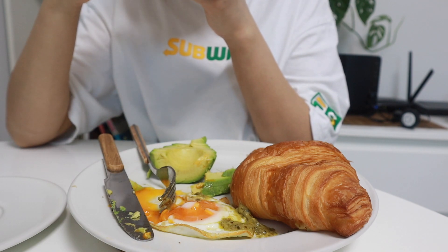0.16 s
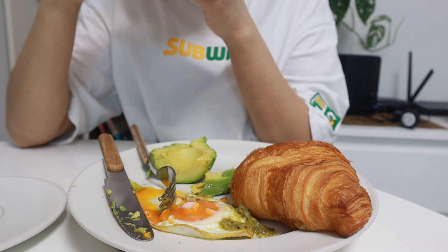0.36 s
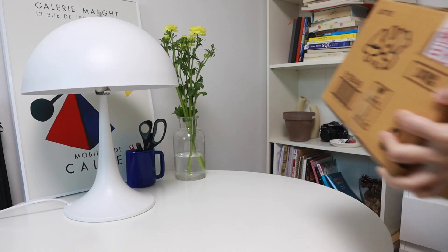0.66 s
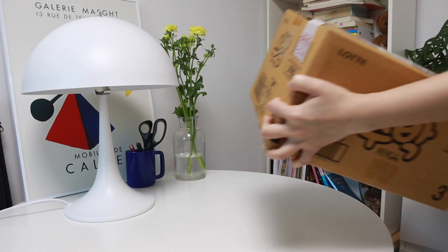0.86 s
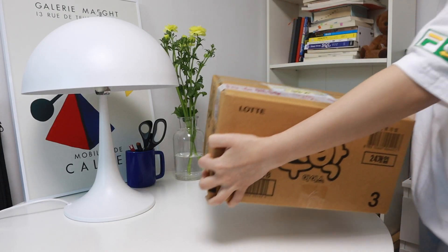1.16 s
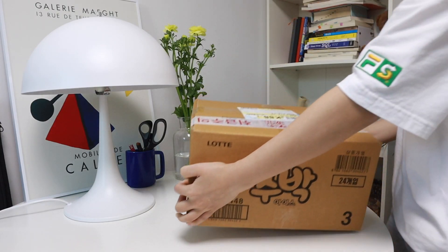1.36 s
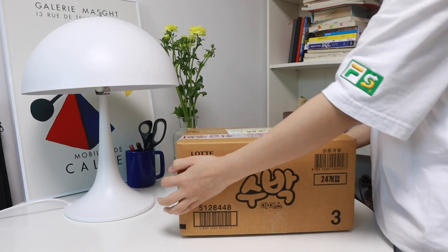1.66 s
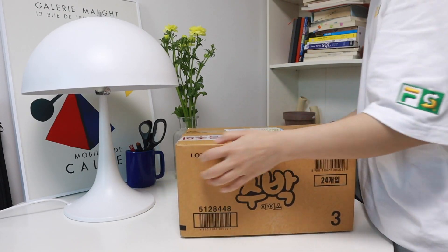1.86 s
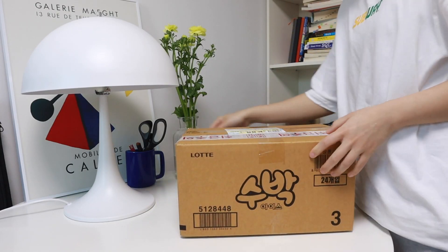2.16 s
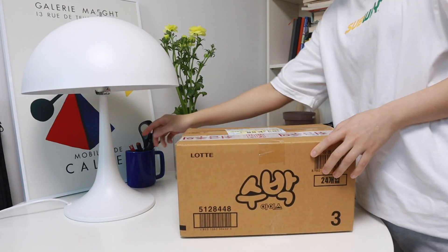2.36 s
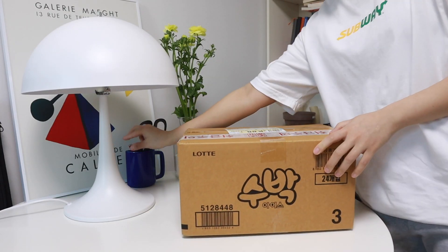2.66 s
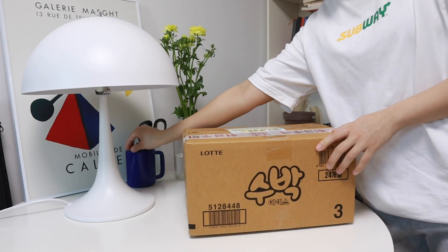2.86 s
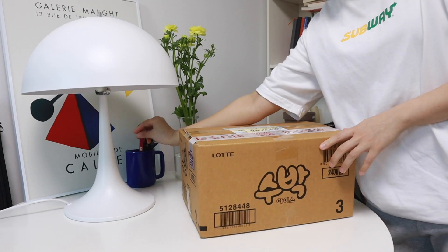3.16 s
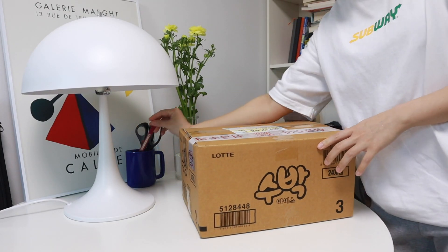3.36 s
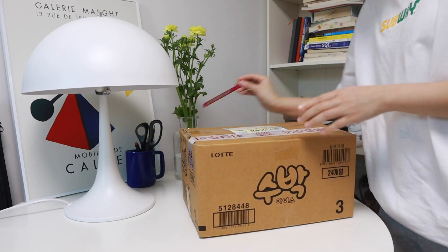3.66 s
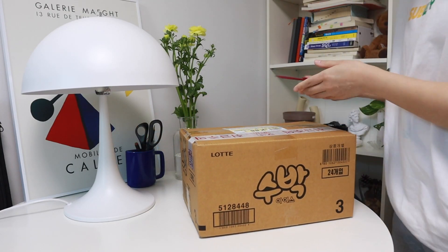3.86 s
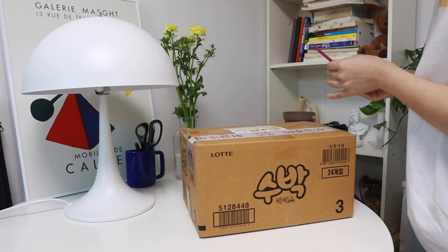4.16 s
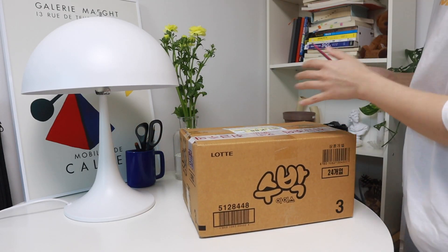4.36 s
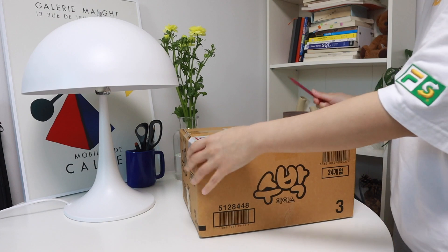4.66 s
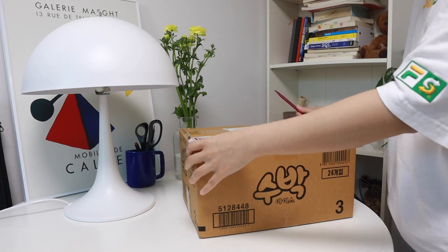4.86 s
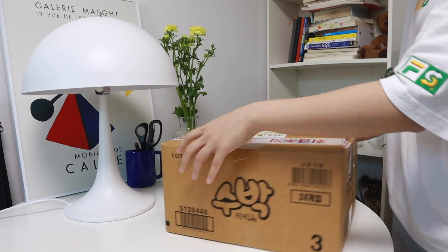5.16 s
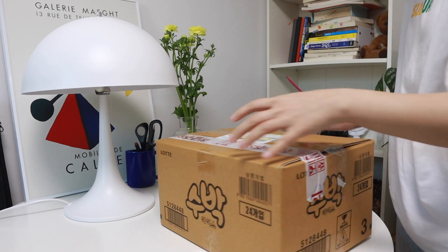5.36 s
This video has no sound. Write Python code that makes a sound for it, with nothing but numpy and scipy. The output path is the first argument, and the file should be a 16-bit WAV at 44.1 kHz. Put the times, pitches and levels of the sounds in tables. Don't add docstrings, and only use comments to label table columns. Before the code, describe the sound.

A quiet small room with low hum and soft air, heard close in stereo. After faint ticks, a switch snaps crisply at about 0.74 s and releases, slightly lower, at 0.83 s. Light rubbing leads to a cardboard box landing at 1.5 s: a quick cluster of dull, low thuds with a table boom and a grainy scuff, settling by 1.7 s. Hands brush the carton around 2.1 s; a dry tick comes at 2.67 s. Soft hollow knocks at 3.0 and 3.1 s precede ceramic clinks from a mug at 3.2 s and a brighter rim hit at 3.42 s, with fading taps until 3.6 s. Sparse handling ticks follow, sharper near 4.0 s. At 4.6 s a cutter blade slides out in a rapid ratcheting hiss of a tenth of a second. The box bumps softly at 4.7 and 4.93 s, then rubs and drags, with a high chirp at 5.08 s and short lower squeaks until 5.45 s, leaning right.

```python
import sys
import numpy as np
from scipy import signal
from scipy.fft import rfft, irfft, next_fast_len
from scipy.io import wavfile
from scipy.ndimage import uniform_filter1d

SR = 44100
rng = np.random.default_rng(int(sys.argv[2]) if len(sys.argv) > 2 else 0)


def log_audio(samples):
    frames = np.atleast_2d(samples).T
    limited = np.clip(frames, -1, 1)
    pcm = np.round(limited * 32767).astype(np.int16)
    wavfile.write(sys.argv[1], SR, pcm)


def nominal_scale(level):
    x = np.asarray(level, float) / 20
    return 10 ** x


N = 242407
TIME = np.arange(N) / SR
FALL = np.log(1000)


def at_hz(table, size):
    hz, value = np.transpose(table)
    return np.interp(np.log(np.fft.rfftfreq(size, 1 / SR) + 1), np.log(hz + 1), value)


def unit(x):
    return x / np.sqrt(np.mean(x ** 2))


def colour(x, table):
    return irfft(rfft(x) * nominal_scale(at_hz(table, len(x))), len(x))


def band(x, lo_hz, hi_hz):
    limits = [lo_hz, min(hi_hz, .45 * SR)]
    return signal.sosfilt(signal.butter(2, limits, "bandpass", fs=SR, output="sos"), x)


def walk(rate):
    k = int(SR / rate)
    steps = rng.standard_normal(N // 100)
    stairs = steps[np.arange(N) // k]
    return 1.68 * uniform_filter1d(uniform_filter1d(stairs, k), k)


def add(out, s, x, peak_db):
    i = int(s * SR)
    x = x[:N - i]
    out[i:i + len(x)] += x * nominal_scale(peak_db) / np.max(np.abs(x))


def soft_edge(size, rise_s):
    return 1 - np.exp(-np.arange(size) / SR / rise_s)


def ring(modes, seconds, spread_db, detune):
    t = np.arange(int(seconds * SR)) / SR
    hz, db, t60 = np.transpose(modes)[:, :, None]
    chance = rng.standard_normal((5, len(hz), 1))
    gain = nominal_scale(db + spread_db * chance[0])
    flutter = 1 + .45 * np.sin(2 * np.pi * 22 * chance[3] * t + 3 * chance[4])
    phase = 2 * np.pi * hz * (1 + detune * chance[1]) * t + .3 * chance[2]
    decay = np.exp(-FALL * t / np.clip(t60, .003, .55))
    x = (gain * flutter * decay * np.sin(phase)).sum(0)
    return x / np.max(np.abs(x))


def burst(size, lo_hz, hi_hz, t60):
    decay = np.exp(-FALL * np.arange(size) / SR / max(t60, .002))
    x = band(rng.standard_normal(size), lo_hz, hi_hz) * decay
    return x / np.max(np.abs(x))


def blows(events, modes, damp, slap_t60, slap_hz):
    out, edge = np.zeros(N), soft_edge(8192, 0.0017)
    for s, db, slap_db, contact_ms in events:
        push = np.hanning(int(max(contact_ms, .1) * SR / 1000) + 3)
        body = ring(np.array(modes) * [1, 1, damp], .6, 2.5, .012)
        body = body * (1 - 0.45 * np.exp(-TIME[:len(body)] / 0.0043))
        add(out, s, signal.fftconvolve(body, push), db - 2.5)
        slap = band(burst(8192, 200, slap_hz, slap_t60), 92, 11.0 * slap_hz)
        add(out, s, edge * slap, db + slap_db + 14.0)
    return out


def grains(rate, spread_db):
    size = nominal_scale(spread_db * np.minimum(rng.exponential(size=N), 4)) * rng.choice([-1, 1], N)
    return unit(size * (rng.random(N) < rate / SR))


def swell_db(s, rise, fade, db):
    roundness = 1.53
    late = TIME - s
    away = np.where(late < 0, -late / max(rise, .005), late / max(fade, .005))
    return db - 10 * away ** roundness


def tail(t60, size):
    x = rng.standard_normal(size) * np.exp(-FALL * np.arange(size) / SR / t60)
    return x / np.sqrt(np.sum(x ** 2))


def box_thuds():
    # t/s, peak/dB, edge slap against the peak/dB, contact/ms
    bumps = [(1.447, -26.5, -26, 1.3), (1.453, -22, -35, 2.6), (1.46, -25, -34, 2.6), (1.474, -26, -25, 3),
             (1.5135, -18, -21.5, 0.34), (1.518, -11, -39, .7), (1.526, -11, -39, 1.1),
             (1.541, -15, -40, 1.9), (1.55, -17.5, -25.5, 1.83), (1.562, -19, -27, 1.4),
             (1.573, -17, -43, 2.8), (1.625, -36, -22, 1.9), (4.699, -38, -15, 5.1),
             (4.727, -36.5, -18, 2.4), (4.744, -45, -21, 0.9), (4.933, -26, -31, 1.64),
             (4.987, -43, -9.5, 1.8)]
    # f/Hz, level/dB, t60/s
    board = [(59, -14, 0.6), (91.5, -31, 0.45), (136, -26, 0.46), (152.3, -18, 0.2), (174.2, -11, 0.12),
             (202, 2, 0.032), (253, -8, 0.12), (320, 3.5, 0.029), (329, -5, 0.1), (409, -4, 0.083),
             (456, -8, 0.084), (554, -0.5, 0.076), (680, -11, 0.08), (857, -15, 0.061), (1015, -4, 0.071)]
    return blows(bumps, board, 1.0, 0.075, 3050)


def table_sway():
    # t/s, peak/dB, slap against the peak/dB, contact/ms
    landings = [
        (1.451, -28, -50, 2.7),
        (1.516, -12.5, -50, 0.86),
        (1.556, -18.5, -50, 2.1),
        (4.701, -34.5, -50, 5.1),
        (4.934, -29, -48, 3.6),
    ]
    # f/Hz, level/dB, t60/s
    sway = [(58, -13, .55), (92.8, -11, 0.46), (136.7, -6, 0.61), (151.1, -1, 0.32), (176.3, -7, 0.27),
            (223.2, -6.5, 0.21), (254, -5.5, 0.21), (310, -6, 0.17), (329, -5, 0.099), (395, -7, 0.23),
            (545, 1, 0.092)]
    return blows(landings, sway, 1.0, .05, 800)


def switch():
    # t/s, peak/dB, housing against the peak/dB, t60/s, brightness/dB per octave
    clicks = [(0.7415, -27, -8, 0.019, 1), (.7440, -13.5, -18, 0.012, 12),
              (0.7477, -19.5, -15.5, 0.023, -2), (0.7635, -26.5, 1.5, 0.02, 6),
              (0.7647, -26.5, 7.5, 0.027, -7), (.7745, -49, 13, 0.067, -13), (0.8267, -25, -21, 0.018, 8),
              (0.8275, -21, -15.5, 0.019, -0.5), (.8320, -32.5, 1, 0.027, 1),
              (0.8408, -29.5, 12, 0.026, -11), (.8455, -44, 14, 0.035, -10)]
    # f/Hz, level/dB
    spring_modes = [(2920, 11.5), (4310, -4), (4930, 13), (7150, -10), (7930, 2.5), (8800, -19),
                    (9880, -12.5), (11500, 2), (11800, -2)]
    # f/Hz, level/dB
    housing_modes = [(824, 7.5), (960, 4), (1300, -8), (1480, -10), (1660, -1), (1920, 3), (2250, -1),
                     (2800, 2.5), (3580, -1.5)]
    out = np.zeros(N)
    for s, db, housing_db, t60, tilt_db in clicks:
        a, b = (.955, .88) if s > .8 else (1, 1)
        snap = [(a * f, g / 2 + tilt_db * np.log2(f / 6000), 0.69 * t60) for f, g in spring_modes]
        spring = ring(snap, .06, 3, .012)
        housing = ring([(b * f, g, .7 * t60) for f, g in housing_modes], .06, 2, .015)
        add(out, s, spring + 0.43 * burst(len(spring), 850, 11100, t60), db + 3.0)
        add(out, s, housing, db + housing_db + 4.5)
    return out


def mug():
    # t/s, peak/dB, crack against the peak/dB, share of the full ring length, height (0 low, 1 rim)
    clinks = [
        (3.2003, -30, -14, .3, .05),
        (3.2041, -23, -9.5, 0.28, .01),
        (3.212, -34, -11, 0.41, 0.083),
        (3.233, -37, -11, 0.44, .1),
        (3.4156, -19.5, -8, 0.4, 0.87),
        (3.4225, -25.5, -17, .5, 0.88),
        (3.433, -30.5, -10, 0.5, 0.96),
        (3.465, -32.5, -16, 0.79, 0.24),
        (3.553, -39, -4, 0.42, 0.94),
        (3.594, -49, -20, 0.36, 0.5),
    ]
    # f/Hz, level struck low/dB, level struck at the rim/dB, t60/s
    wall_modes = [(2056, 3, -14.5, 0.19), (2098, -4, -5, 0.31), (2380, -8.5, 0.5, 0.19),
                  (3193, 1.5, -1.5, 0.26), (3794, -9.5, -12, 0.3), (4564, -16, -1.5, 0.3),
                  (5300, -4, -3, 0.19), (5720, -7, -23, 0.2), (6450, -26, -10, 0.13),
                  (6910, -15, -18, 0.23), (7280, -20, -16, 0.18), (7640, -3.5, -1.5, 0.15),
                  (8220, -13, -24, 0.15), (9080, -21, -17, .2), (9595, -27, -8.5, 0.15),
                  (10300, -30, -15, 0.28), (10960, -16, -18, 0.27), (11360, -19, -6, 0.12),
                  (11900, -13, -15, 0.33)]
    out = np.zeros(N)
    hz, low_db, rim_db, t60 = np.transpose(wall_modes)
    for s, db, crack_db, length, height in clinks:
        level_db = low_db + np.clip(height, 0, 1) * (rim_db - low_db)
        wall = ring(np.transpose([hz, level_db, t60 * length]), .5, 2, .001)
        add(out, s, wall * soft_edge(len(wall), 0.00085), db - 2.0)
        add(out, s, burst(4096, 2800, 10000, 0.015), db + crack_db)
        add(out, s, burst(8192, 2100, 9000, 0.24), db - 14)
    return out


def knocks():
    # t/s, peak/dB, slap against the peak/dB, contact/ms
    contacts = [(0.599, -56, -3.5, 2.5), (1.149, -38.5, -15.5, 0.22), (2.638, -47.5, -6, 0.4),
                (2.645, -50, -14.5, 0.54), (2.651, -45.5, -12.5, 0.3), (2.665, -43.5, -10.5, .3),
                (2.984, -27.5, -19, 0.34), (2.989, -26, -34, 1.8), (3.034, -37, -25, .6),
                (3.056, -38, -13, .6), (3.106, -28.5, -20.5, 0.51), (3.111, -26, -32, 2.07),
                (3.131, -30.5, -37, 1.7), (3.195, -38, -14.5, 1.16), (3.5, -45, -28, 1.1),
                (3.549, -41, -17.5, 0.44), (3.595, -37.5, -15, 0.9)]
    # f/Hz, level/dB, t60/s
    hollow = [(222, -21, 0.25), (248, -12, 0.18), (280.5, -0.5, 0.24), (309.7, -2.5, 0.093),
              (357, -3, 0.17), (420, -3, 0.073), (490, -19, 0.049), (579, -2.5, 0.098), (677, 3.5, 0.086),
              (812, 0.5, 0.16), (1000, -10, 0.11), (1220, -18, .05), (2430, -28, .06)]
    return blows(contacts, hollow, 1.02, 0.065, 970)


def skid():
    # f/Hz, level/dB per Hz
    rail = [(880, -41.5), (1500, -25.5), (2550, -17), (2860, -12), (5030, -10), (7570, -6), (12000, -4.5),
            (16000, -22)]
    # t/s, peak/dB, blade ring/dB
    teeth = [(4.598, -30, -57), (4.6063, -26.5, -50), (4.612, -24, -55), (4.617, -24, -48),
             (4.629, -25, -42), (4.634, -29, -56), (4.640, -23.5, -44.5), (4.645, -26, -46),
             (4.6562, -25, -41), (4.663, -36.5, -58), (4.673, -28, -39), (4.679, -29, -49),
             (4.694, -35, -40), (4.702, -36, -50)]
    slips = grains(5000, 1.3) + 1.4 * rng.standard_normal(N)
    db = swell_db(4.62, 0.22, 0.069, -39.5) + 2.1 * walk(120)
    start = np.clip((TIME - 4.597) / 0.0015, 0, 1)
    out = unit(colour(slips, rail)) * nominal_scale(db) * start
    for s, tooth_db, blade_db in teeth:
        add(out, s, burst(2048, 3700, 17000, 0.017), tooth_db)
        add(out, s, ring([(2960, 2.3, 0.038), (4100, -2, 0.032)], .05, 4, 0.019), blade_db)
    return out


def squeaks():
    # t/s, length/s, slip rate from f/Hz, to f/Hz, level/dB
    cries = [
        (4.721, 0.34, 2290, 2300, -65),
        (5.081, 0.026, 2720, 3220, -36.5),
        (5.129, 0.024, 559, 582, -34.5),
        (5.149, 0.027, 602, 700, -42),
        (5.161, 0.0338, 683.3, 712.4, -30),
        (5.205, 0.02, 706, 717, -46),
        (5.249, 0.041, 680, 597, -44.5),
        (5.41, 0.032, 520, 497, -53.5),
    ]
    # f/Hz, level/dB
    carton = [(500, -9.5), (700, -20), (1150, -4), (1420, 1), (1750, -17), (2110, -8), (2280, 2.5),
              (2800, -5), (3300, -13), (3550, -8.5), (4200, -19), (4950, -17.5), (6000, -34), (9000, -86.5)]
    firm_db = -30
    out, wobble = np.zeros(N), walk(300)
    body_hz, body_db = np.transpose(carton)
    for s, length, from_hz, to_hz, db in cries:
        on = (TIME > s) & (TIME < s + length)
        share = (TIME[on] - s) / length
        rate = (from_hz + share * (to_hz - from_hz)) * (1 + 0.012 * wobble[on])
        phase = 2 * np.pi * np.cumsum(rate) / SR
        tone = 0
        for k in range(1, 9):
            soft_db = min(db - firm_db, 0) * max(k - 4, 0)
            tone = tone + nominal_scale(np.interp(k * rate, body_hz, body_db) + soft_db) * np.sin(k * phase + k * k)
        grip = np.sin(np.pi * share) ** 0.81
        out[on] += tone * nominal_scale(db + 0.52 * wobble[on]) * grip
    return out


def rubbing():
    # peak t/s, swell/s per 10 dB, fade/s per 10 dB, level/dB, brightness/dB per range
    strokes = [(0.14, 2, 0.5, -74.5, 2.5), (0.599, -0.5, 4, -68, -1), (0.8, -0.39, 0.14, -60, -4),
               (1.167, 0, -0.45, -50.5, 1.5), (1.19, 0.03, 0.04, -56, -2),
               (1.452, 0.12, 0.1336, -44.5, 2.5), (1.58, 0.0459, 0.2, -50.5, -1.5),
               (1.739, 0.0854, 0.05, -51, 3), (2.13, .035, .1, -51, 5), (2.471, 0.3, 0.16, -67, -3),
               (2.68, 0.08, 0.3, -61, -3.5), (2.993, 0.17, 0, -52.5, -1), (3.098, 0.07, 0.24, -56, 0),
               (3.53, 0.2, 0.15, -58, -2), (3.3, 0.14, 0.12, -65, 3.5), (3.661, 0.11, 0.07, -56.5, 4),
               (3.939, -0.5, -0.3, -61, -3), (4.2, 0.35, 0, -65.5, 0), (4.38, 0.35, 0, -66.5, 2.5),
               (4.74, 0, 0, -65, 1), (5.037, 0.1, 0.21, -47.5, 2), (5.16, 0.083, 0.08, -47, 1),
               (5.26, 0.1039, 0.13, -46, 1), (5.38, .06, .09, -51.5, 1), ]
    # peak t/s, swell/s per 10 dB, fade/s per 10 dB, level/dB
    shifts = [
        (1.548, 0.04, 0.07, -34.5),
        (1.699, 0, 0.12, -49.5),
        (3.0, -0.2, 0.2, -50.5),
        (3.12, 0.0452, 0.15, -43),
        (3.55, 0.17, -6.5, -52),
        (4.719, -0.39, 0.07, -41.5),
        (5.15, -0.43, 0.1, -48),
    ]
    ranges_hz = (70, 270, 1300, 4200, 9500, 17000)
    rest_db = (-58.5, -65, -76, -73.5)
    top_db = -3
    power = nominal_scale(2 * np.array(rest_db))[:, None] * np.ones(N)
    power[0] += sum(nominal_scale(2 * swell_db(*row)) for row in shifts)
    for *row, bright_db in strokes:
        tilt_db = np.array([[-bright_db], [0], [bright_db + top_db]])
        power[1:] += nominal_scale(2 * swell_db(*row)) * nominal_scale(2 * tilt_db)
    patches = nominal_scale(1.2 * walk(30))
    fibre = rfft((grains(5000, 0.75) + 0.69 * rng.standard_normal(N)) * patches)
    out = 0
    for k, level in enumerate(np.sqrt(power)):
        window = at_hz(np.transpose([ranges_hz, np.arange(len(ranges_hz)) == k + 1]), N)
        out = out + unit(irfft(fibre * window, N)) * level * nominal_scale(-3.5 + walk(16))
    return out


def scuffs():
    # t/s, peak/dB, t60/s, low f/Hz, high f/Hz
    swipes = [
        (1.553, -25.5, 0.054, 1500, 9800),
        (2.085, -42.5, 0.48, 1720, 13500),
        (2.668, -44, 0.87, 1190, 8460),
        (5.411, -37, 0.14, 820, 2250),
    ]
    out, size = np.zeros(N), SR // 2
    for s, db, t60, lo_hz, hi_hz in swipes:
        add(out, s, soft_edge(size, 0.0093) * burst(size, lo_hz, hi_hz, t60), db)
    return out


def ticks():
    # t/s, peak/dB, ring f/Hz, t60/s, crack against the peak/dB
    contacts = [(0.028, -56, 1680, 0.0059, 9.5), (0.0945, -59, 4860, 0.038, 5),
                (0.111, -65, 2360, 0.058, -8), (0.1361, -43.5, 3220, 0.016, -0.5),
                (0.155, -51, 2790, 0.045, -3), (1.922, -46, 1650, 0.058, -5),
                (2.6698, -25, 4100, 0.011, -6.5), (2.676, -36, 4570, 0.0072, -4),
                (2.6892, -49, 4530, .01, -8), (3.098, -36.5, 5460, 0.066, -13),
                (3.1176, -43, 3190, 0.02, -15), (3.377, -46, 6800, 0.065, -0.5),
                (3.184, -36, 5470, 0.0084, -18), (3.893, -52, 10900, 0.025, -2),
                (3.9392, -52, 2170, 0.04, -18), (3.9866, -43, 8100, .015, -6),
                (3.9914, -39, 6100, 0.027, -4), (3.9955, -35.5, 8200, 0.027, -11),
                (3.999, -35, 10400, 0.07, -11), (4.0892, -47, 1420, 0.056, -3),
                (4.132, -49, 10000, 0.05, 0.5), (4.237, -52.5, 2680, 0.081, 0.5),
                (4.385, -41.5, 1590, 0.075, -0.5), (4.482, -50.5, 3310, 0.058, 1.5),
                (4.4993, -46.5, 1620, 0.11, 3.5), (5.03, -34, 3870, 0.055, -17),
                (5.047, -40, 3300, .025, -15), (5.115, -39, 5630, .04, -15),
                (5.245, -34.5, 3470, 0.044, -19), (5.265, -45, 4400, .03, -15)]
    out, edge = np.zeros(N), soft_edge(8192, 0.00074)
    for s, db, hz, t60, broad_db in contacts:
        add(out, s, edge * burst(8192, hz / 1.46, hz * 1.38, t60), db - 0.5)
        add(out, s, edge * burst(8192, 1100, 12000, t60 * 1.67), db + broad_db - 0.5)
    return out


def room_tone():
    # f/Hz, level/dB per Hz
    hum = [(13, -30), (22, -1), (59, 4.5), (107, -2.5), (182, 0.5), (309, -34), (350, -9.5), (594, -9.5),
           (709, -13.5), (1260, -18.5), (7180, -33), (9000, -31), (12000, -46.5), (16000, -61)]
    air = unit(colour(rng.standard_normal(N), hum)) * nominal_scale(-53.5 - 6.0)
    low = band(air, 22, 150)
    return air - low + low * nominal_scale(1.5 * walk(4))


def port_difference(near):
    # f/Hz, level/dB
    ports = [(30, -39.5), (85, -60), (175, -26.5), (350, -16.5), (700, -7.5), (1400, -4.5), (2800, -0.5),
             (5600, 2), (10000, 4.5), (13800, 7), (15000, -42)]
    # f/Hz, share (0-1)
    diffuse = [(100, .9), (1000, .95), (3000, .75), (8000, .5), (14000, .3)]
    # t/s, left minus right level/dB
    lean = [
        (0, 1),
        (2.2, -3.5),
        (2.7, -5),
        (3.5, -2.5),
        (4.6, 0),
        (5.1, -6),
        (5.5, -3),
    ]
    # f/Hz, level/dB per Hz
    rest = [(15, -76), (25, -28), (154, -11), (313, -5), (516, -7.5), (573, -5.5), (997, -8.5),
            (1300, -7.5), (14000, -30), (15200, -67)]
    size = next_fast_len(N + 8192)
    share = at_hz(diffuse, size)
    path = 1j * np.sqrt(1 - share) + np.sqrt(share) * rfft(tail(.25, 8192), size)
    side = irfft(rfft(near, size) * path * nominal_scale(at_hz(ports, size)), size)[:N]
    pan_db = np.interp(TIME, *np.transpose(lean))
    side = side + np.tanh(pan_db * np.log(10) / 40) * band(near, 1100, 7900)
    return side + unit(colour(rng.standard_normal(N), rest)) * nominal_scale(-58.5 + 0.98 * walk(0.96))


def scene():
    hits = box_thuds() + knocks() + scuffs() + mug() + ticks() + squeaks() + skid()
    echo = band(signal.fftconvolve(hits, tail(0.18, 20000))[:N], 300, 10000)
    near = hits + nominal_scale(-4.5) * echo + rubbing()
    near = signal.sosfilt(signal.butter(6, 13500, fs=SR, output="sos"), near)
    side = port_difference(near)
    mid = near + band(switch(), 600, 19600) + room_tone() + table_sway()
    return np.array([mid + side, mid - side])


def roll_off(x):
    return signal.sosfilt(signal.butter(12, 16660, fs=SR, output="sos"), x)


def record(dry):
    # f/Hz, level/dB
    response = [(20, -17), (50, -8), (90, 0), (300, -0.7)]
    mix = np.array([colour(c, response) for c in dry])
    return roll_off(mix)


dry = scene()
out = record(dry)
log_audio(out)
```